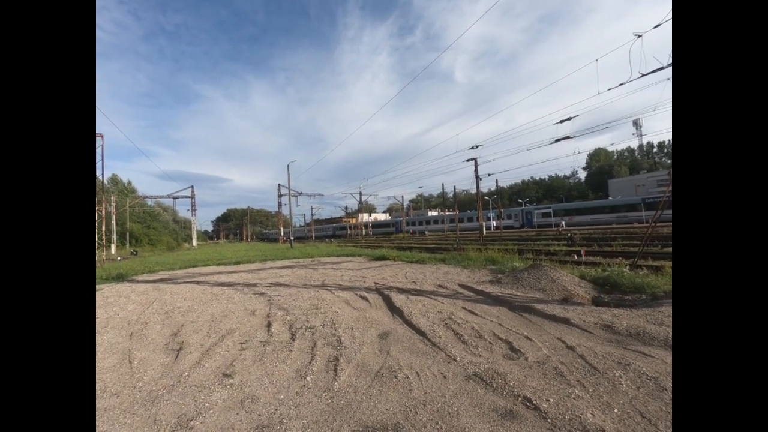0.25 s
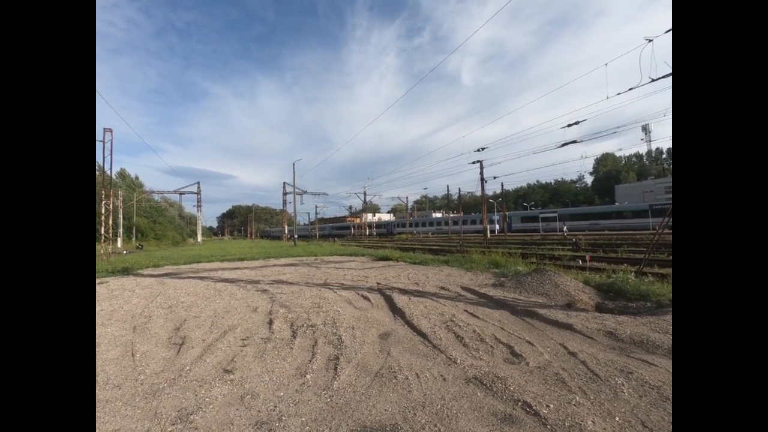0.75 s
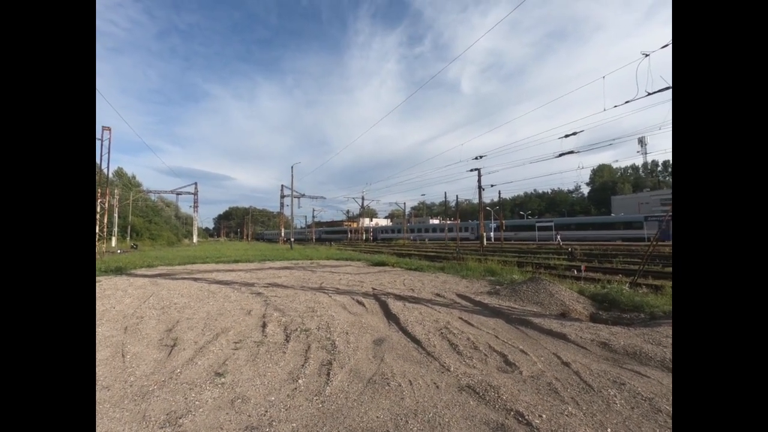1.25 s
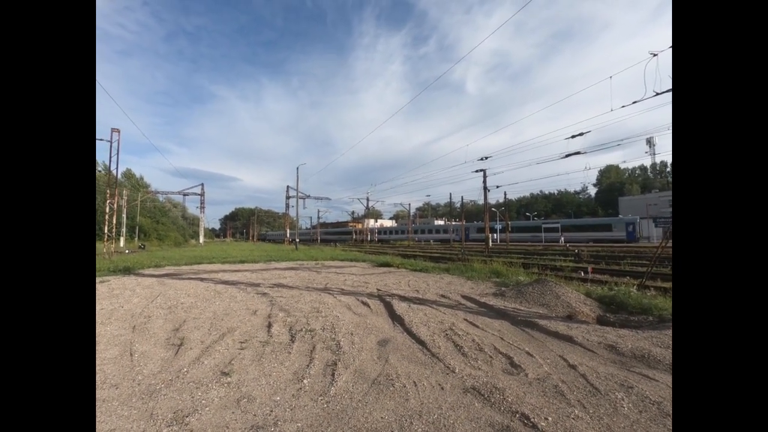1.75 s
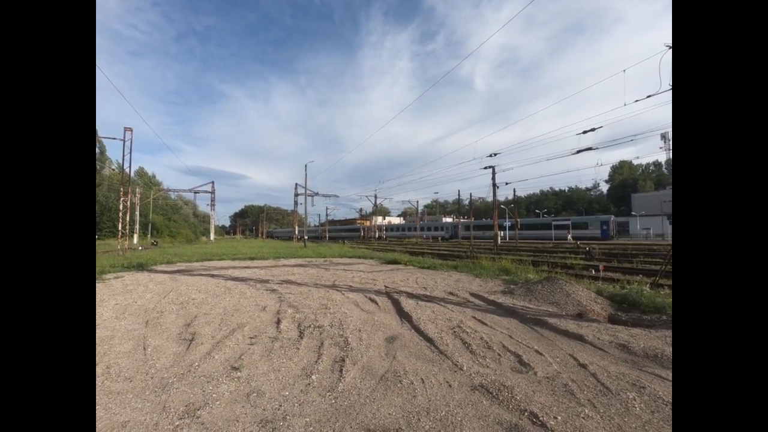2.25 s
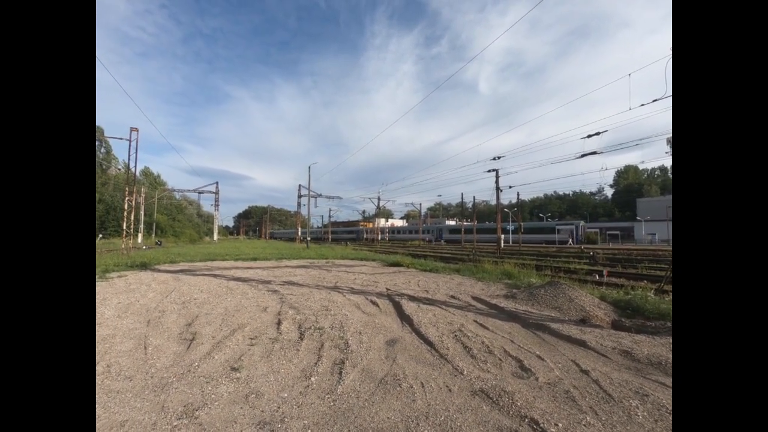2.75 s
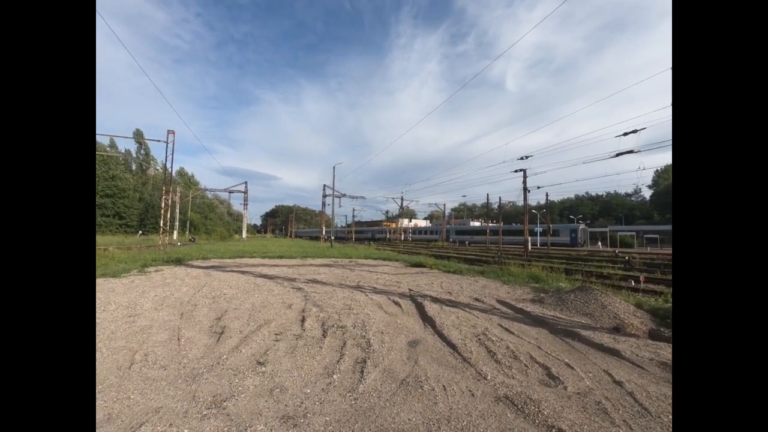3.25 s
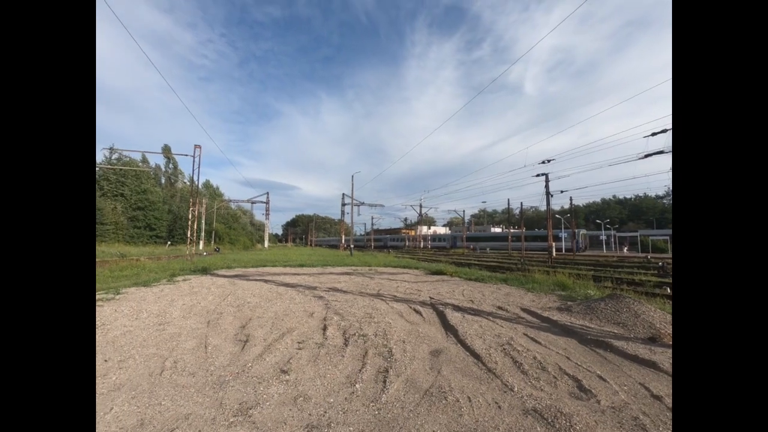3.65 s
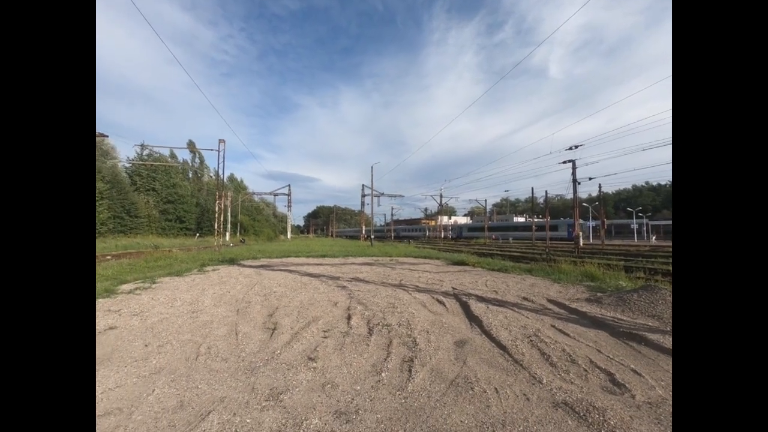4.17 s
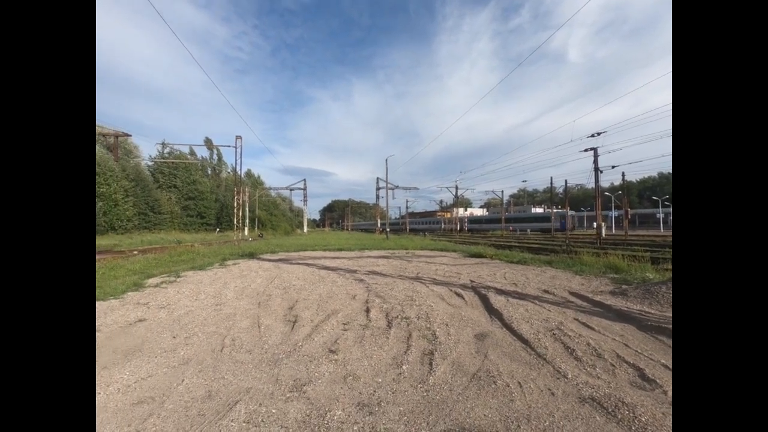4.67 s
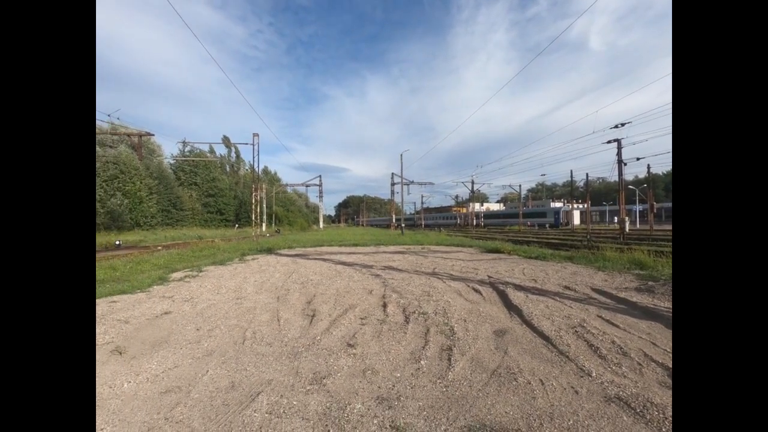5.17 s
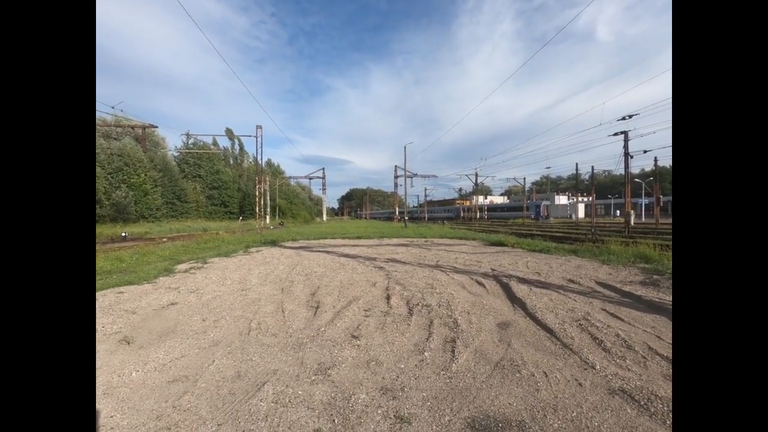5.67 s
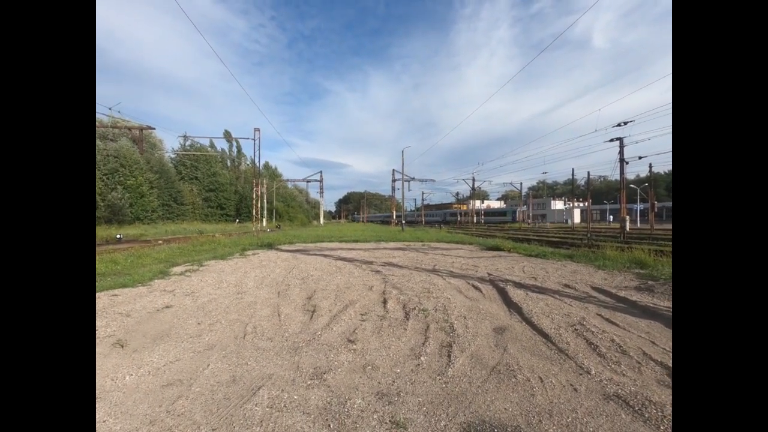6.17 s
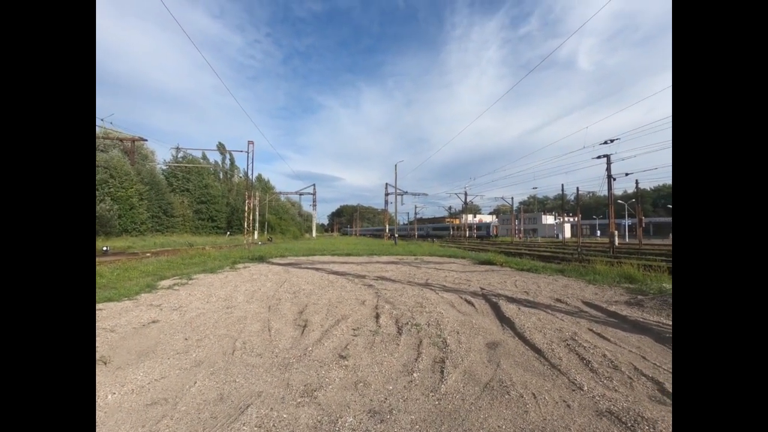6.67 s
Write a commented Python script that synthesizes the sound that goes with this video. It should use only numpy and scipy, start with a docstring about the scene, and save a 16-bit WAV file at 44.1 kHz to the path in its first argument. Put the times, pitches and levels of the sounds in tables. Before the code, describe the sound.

An open station yard, heard through a wind-exposed camera microphone. A passenger train rolls steadily some distance to the right: low rumble, mid-range wheel roar, gradually weakening. Low gusts buffet throughout, uneven between the sides and mostly stronger left. A clank opens at 0.1 s; a thin, grainy squeal near 3.7 kHz fades out by 2 s. A motor hum creeps up from about 145 to 160 Hz, swelling near 3 s and gone by 3.7, with faint gear whine. Couplings clank and ring from 2.0 to 2.4 s, with duller knocks at 2.7-3.1. Flange scrapes hiss and squeak at 2.8, strongly at 3.8 and 4.65, softer at 5.7, bright again at 6.75. Gusts churn and pop at 5.1-5.5 s; one close snap and thump hits the housing at 5.6. Wind flutters hard at 6.5 and 6.9, this time on the right.

```python
"""Station yard: a passenger train rolls through, some way off to the right.
Shaped noise makes rumble and wheel roar; wavering sines make motor and gear hum and one thin, fading squeal.
Couplings clank as decaying noise and rough rings; curve-bound flanges hiss, ring and squeak every second or so.
Gusts of low noise buffet the microphone ports, churning and popping at their strongest.
Something knocks once on the camera: a snap and a low thump through its housing."""
import sys
import numpy as np
from scipy import signal
from scipy.fft import rfft, irfft, next_fast_len
from scipy.io import wavfile
from scipy.ndimage import map_coordinates

SR = 44100
rng = np.random.default_rng(int(sys.argv[2]) if len(sys.argv) > 2 else 0)


def output_pcm(signal):
    """Save a mono or channel-first signal as 16-bit PCM at the path in sys.argv[1].

    Samples are clipped to [-1, 1] before scaling.
    """
    pcm = np.clip(np.atleast_2d(signal).T, -1, 1) * 32767
    wavfile.write(sys.argv[1], SR, np.round(pcm).astype(np.int16))


N = 305172


def amp(db):
    """Decibels to gain."""
    return 10 ** (np.asarray(db) / 20)


def unit(x):
    """Scale to rms 1."""
    return x / np.sqrt(np.mean(x ** 2) + 1e-20)


def clock():
    """Time of every sample in s."""
    return np.arange(N) / SR


def along(points, hz):
    """Interpolate (f/Hz, value) points on a log frequency axis."""
    f, v = np.transpose(points)
    return np.interp(np.log(hz + 1), np.log(f + 1), v)


def curves(rows):
    """One value per sample for each column after the time."""
    s, *cols = np.transpose(rows)
    return [np.interp(clock(), s, c) for c in cols]


def during(start_s, end_s, fade_s=0.23):
    """1 from start to end, linear fades to 0 outside."""
    t = clock()
    return np.clip(1 + np.minimum(t - start_s, end_s - t) / fade_s, 0, 1)


def wobble(knots_per_s):
    """Smooth random curve through normal random knots."""
    knots = rng.standard_normal(int(N * knots_per_s / SR) + 4)
    return map_coordinates(knots, [np.arange(N) * knots_per_s / SR])


def filtered(x, response):
    """Apply a complex response of frequency."""
    size = next_fast_len(N + SR // 2)
    spectrum = rfft(x, size) * response(np.fft.rfftfreq(size, 1 / SR))
    return irfft(spectrum, size)[..., :N]


def noise(gain):
    """Two independent noises, jointly of rms 1, coloured by a gain of frequency."""
    return unit(filtered(rng.standard_normal((2, N)), gain))


def bell(hz, centre_hz, width_hz):
    """Resonance curve, peak 1, half height at centre +/- width/2."""
    return 1 / (1 + (2 * (hz - centre_hz) / width_hz) ** 2)


def panned(db):
    """Left and right gains, averaging 1, for a left-minus-right level difference."""
    ratio = amp(np.atleast_1d(db))
    return 2 * np.array([ratio, np.ones_like(ratio)]) / (1 + ratio)


def add(track, s, sound):
    """Mix a sound into a track at time s, cut at the track's end."""
    part = track[..., round(s * SR):][..., :sound.shape[-1]]
    part += sound[..., :part.shape[-1]]


def tone(hz, drift, flutter_db, flutter_knots_per_s=22):
    """Sine of about rms 1; pitch (drift as a share) and level waver."""
    phase = 2 * np.pi * np.cumsum(hz * (1 + drift * wobble(35))) / SR
    return np.sqrt(2) * amp(flutter_db * wobble(flutter_knots_per_s)) * np.sin(phase)


# rolling noise spectrum: f/Hz, relative density/dB
ROLLING_SPECTRUM = [(300, -15), (600, -0.5), (830, 6.5), (1150, 0), (1900, -4), (3400, -3), (4000, -7),
                    (4900, -13), (5900, -11), (7700, -10), (8100, -19.5), (10000, -29), (11500, -47),
                    (15000, -79)]
# broad wheel and rail resonances: f/Hz, width/Hz, lift/dB
TRACK_RESONANCES = [(1594, 227, 8), (2274, 215, 9), (2753, 54, 9), (3246, 270, 4)]


def track_colour(hz):
    """Rolling spectrum, lifted where wheel and rail resonate."""
    lift = sum(amp(db) ** 2 * bell(hz, f, width) for f, width, db in TRACK_RESONANCES)
    return amp(along(ROLLING_SPECTRUM, hz)) * np.sqrt(1 + lift)


# levels as heard at the camera, dropping after the hard gust, before the layer gains:
# t/s, rumble level/dB, rolling level/dB
HEARD_LEVELS = [(0.0, -49.5, -51.5), (1.29, -51.5, -55.5), (2.79, -48, -54.5), (3.43, -53.5, -55.5),
                (4.26, -55, -55.5), (4.53, -54, -56.5), (5.05, -53, -54), (5.36, -52, -60.5),
                (5.59, -58, -60.5), (6.09, -58.5, -59), (6.69, -59.5, -59), (6.92, -54.5, -55)]
# rumble spectrum: f/Hz, relative density/dB
RUMBLE_SPECTRUM = [(30, -18), (90, 0), (160, 0.5), (200, -2.5), (245, -1), (330, -12.5), (430, -13.5),
                   (530, -23.5), (650, -26.5), (820, -26), (1500, -63)]
RUMBLE_GAIN_DB, ROLLING_GAIN_DB = 11, 5.5


def rolling(surge_db=2.6, surge_knots_per_s=13):
    """Rough treads shake the car bodies in surges low down, and wheels and rails higher up."""
    rumble_db, roll_db = curves(HEARD_LEVELS)
    rumble_db = rumble_db + RUMBLE_GAIN_DB + surge_db * wobble(surge_knots_per_s)
    roll_db = roll_db + ROLLING_GAIN_DB + 0.5 * wobble(14)
    rumble = amp(rumble_db) * noise(lambda hz: amp(along(RUMBLE_SPECTRUM, hz)))
    return rumble + amp(roll_db) * noise(track_colour)


# traction motor: t/s, f/Hz, level/dB, octave level/dB
MOTOR_TRACK = [(0, 145, -38, -62), (.45, 146, -38, -51), (.8, 147.5, -47.5, -57),
               (1.3, 149.5, -48.5, -57.5), (1.7, 152.4, -40.5, -54), (2.15, 154, -42.5, -56),
               (2.35, 155, -36.5, -62), (2.7, 156, -35.5, -65), (3.0, 159, -31.5, -60),
               (3.25, 160, -44, -60), (3.7, 160.6, -43.5, -67.5)]
# gear whine: t/s, lower tone level/dB, upper tone level/dB
GEAR_LEVELS = [(0, -57.5, -62), (1.0, -60, -68), (1.8, -58.5, -71.5), (2.4, -62.5, -59.5), (3.1, -62, -56)]
GEAR_LOW_HZ, GEAR_HIGH_HZ = 413.2, 433
HUM_FLUTTER_DB, HUM_FLUTTER_KNOTS_PER_S = 2.2, 16
MOTOR_DRIFT, GEAR_DRIFT = 0.009, 0.007  # shares of the pitch


def hum(hz, db, drift):
    """Sine hum, wavering on its way through the air."""
    return amp(db) * tone(hz, drift, HUM_FLUTTER_DB, HUM_FLUTTER_KNOTS_PER_S)


def drive():
    """Motor pitch with its octave, and two steady-pitched gear tones."""
    motor_hz, motor_db, octave_db = curves(MOTOR_TRACK)
    low_db, high_db = curves(GEAR_LEVELS)
    motor = hum(motor_hz, motor_db, MOTOR_DRIFT) + hum(2 * motor_hz, octave_db, MOTOR_DRIFT)
    gears = hum(GEAR_LOW_HZ, low_db, GEAR_DRIFT) + hum(GEAR_HIGH_HZ, high_db, GEAR_DRIFT)
    return during(0, MOTOR_TRACK[-1][0]) * motor + during(0, GEAR_LEVELS[-1][0]) * gears


SQUEAL_HZ, SQUEAL_START_DB, SQUEAL_FADE_DB_PER_S, SQUEAL_END_S = 3670, -59.5, 3.5, 2.0
OCTAVE_START_S, OCTAVE_END_S = 0.36, 0.68


def squeal(octave_db=-3.5):
    """One wheel mode locks into stick-slip: a thin, grainy, fading tone with a brief octave."""
    octave = tone(2 * SQUEAL_HZ, drift=0.0013, flutter_db=2.5)
    octave *= amp(octave_db) * during(OCTAVE_START_S, OCTAVE_END_S, fade_s=0.4)
    fundamental = tone(SQUEAL_HZ, drift=0.0022, flutter_db=2.5, flutter_knots_per_s=44)
    level = amp(SQUEAL_START_DB - SQUEAL_FADE_DB_PER_S * clock())
    return during(0, SQUEAL_END_S, fade_s=0.5) * level * (fundamental + octave)


# gusts: peak t/s, time from peak to -17 dB/s, level/dB, left minus right/dB
GUST_EVENTS = [(.12, .08, -24, -12), (.24, .12, -22.5, -12), (.39, .08, -25, -12), (.78, .13, -26, -13),
               (.89, .08, -29, -10), (1.13, .1, -30, -10), (1.52, .1, -29, -11), (1.85, .07, -27.5, -6),
               (2.14, .12, -28.5, -5), (2.42, .12, -26, -6), (2.76, .12, -29, -7), (2.98, .2, -29, -8),
               (3.34, .15, -26, -10), (3.65, .06, -27, -9), (3.75, .06, -27, -7), (3.96, .11, -25.5, -7),
               (4.25, .13, -23, -6), (4.6, .08, -28, -6), (4.76, .1, -26.5, -7), (4.9, .13, -24.5, -11),
               (5.08, .2, -23, -10), (5.36, .2, -25, -15), (5.52, .13, -26, -13), (5.75, .15, -29, -9),
               (6.33, .14, -27.5, -11), (6.54, .1, -28, -3), (6.74, .14, -22.5, -7), (6.88, .1, -22, -3)]
# buffeting spectrum: f/Hz, relative density/dB
BUFFET_SPECTRUM = [(10, -10), (24, 0), (45, 2.5), (75, -1.5), (115, -4), (170, -17), (260, -30.5),
                   (450, -42), (1000, -96)]
BREEZE_DB, BREEZE_PAN_DB = -32, -6  # pan: left minus right


def wind(spread_db=2.6, shared=0.51, heave_db=-3.0):
    """Gusts over a breeze: turbulence rumbles in separate lumps per port; hard gusts heave deeper."""
    t = clock()
    gusts = np.zeros((2, N))
    for s, length_s, db, pan_db in GUST_EVENTS:
        gusts += amp(db) * panned(pan_db) * np.exp(-2 * ((t - s) / length_s) ** 2)
    strength = np.hypot(amp(BREEZE_DB) * panned(BREEZE_PAN_DB), gusts)
    a, b = noise(lambda hz: amp(along(BUFFET_SPECTRUM, hz)))
    ports = np.array([shared * a + np.sqrt(1 - shared ** 2) * b, a])  # correlation = shared
    lumps = amp(spread_db * np.array([wobble(16), wobble(18)]))
    deep = noise(lambda hz: bell(hz, 24, 36) ** 1.5)
    heave = amp(heave_db) * strength / strength.max() * deep
    return strength * (unit(lumps * ports) + heave)


SAG_DB_PER_S, RELEASE_DB_PER_S = 6, 41  # release adds to sag


def bite(s, attack_s, hold_s):
    """Flange pressure: linear rise, sag while held, then a faster release as it slides off."""
    t = np.maximum(clock() - s, 0)
    held = np.maximum(t - attack_s, 0)
    released = np.maximum(held - hold_s, 0)
    return np.minimum(t / attack_s, 1) * amp(-SAG_DB_PER_S * held - RELEASE_DB_PER_S * released)


PATCH_HZ, PATCH_S, RESTLESS_DB = 169.2, 0.09, 2.2  # knot spacings and depth of the random field


def restless(pair):
    """The contact point wanders over the wheel, favouring now some modes, now others."""
    z = signal.stft(pair, nperseg=1024)[2]
    bins, frames = z.shape[1:]
    across_f = np.linspace(0, SR / 2 / PATCH_HZ, bins)
    across_t = np.linspace(0, N / SR / PATCH_S, frames)
    where = np.meshgrid(across_f, across_t, indexing="ij")
    field = map_coordinates(rng.standard_normal((bins, frames)), where, mode="mirror")
    return signal.istft(z * unit(amp(RESTLESS_DB * field)), nperseg=1024)[1][:, :N]


# flange bites: t/s, attack/s, hold/s, relative level/dB, lift of the top hiss/dB
FLANGE_BITES = [(0.037, 0.086, 0.037, -65.5, 4), (2.805, 0.085, 0.13, -54.7, 1.8),
                (3.15, 0.036, 0.036, -68, -1), (3.658, 0.028, .02, -68, 6),
                (3.817, 0.036, 0.37, -51.5, 5.3), (4.65, 0.086, 0.43, -53, 3.5), (4.86, .08, 0.089, -61, 1),
                (5.73, 0.06, 0.26, -61.5, 2), (6.15, .1, .2, -73, -10), (6.736, 0.094, 0.059, -51, -0.5)]
# scrape hiss spectrum: f/Hz, relative density/dB
SCRAPE_SPECTRUM = [(700, -26), (1600, -8.5), (3300, 5.5), (4700, 0), (6000, 2.5), (7800, 2), (8400, -0.5),
                   (10700, -9), (11400, -21), (13600, -20), (15000, -44.5)]
# families of close wheel modes: f/Hz, width/Hz, relative level/dB
WHEEL_MODES = [(1636, 70, -5), (2450, 190, 0.5), (3305, 110, 2.5), (4170, 98, 1.5), (5070, 120, -3.5),
               (5650, 80, -9.5), (6000, 180, 1), (6910, 260, -1.5), (7540, 120, -3), (7745, 220, 2),
               (8700, 130, -10.5), (9600, 160, -16), (10500, 300, -21)]
JUDDER_DB, JUDDER_KNOTS_PER_S = 1.2, 45


def flanges(ring_t60_s=0.9, hiss_db=2.0, ring_db=1.2, spacing_hz=14):
    """Each scrape judders, hisses and feeds the wheel's modes, which shift and ring on after it."""
    keep = np.exp(-2 * np.log(1000) / (ring_t60_s * SR))  # energy kept per sample
    grid_hz = np.arange(0, SR / 2, spacing_hz)
    power = sum(amp(db) ** 2 * bell(grid_hz, f, width) ** 2 for f, width, db in WHEEL_MODES)
    families = np.sqrt(power)
    force, sharp, ring = np.zeros(N), np.zeros(N), np.zeros((2, N))
    for s, attack_s, hold_s, db, edge_db in FLANGE_BITES:
        push = amp(db) * bite(s, attack_s, hold_s)
        stored = np.sqrt(signal.lfilter([1 - keep], [1, -keep], push ** 2 + 1e-20))
        # own strong and weak modes per scrape
        modes = families * amp(3.5 * rng.standard_normal(len(grid_hz)))
        ring += stored * noise(lambda hz: np.interp(hz, grid_hz, modes))
        force += push
        sharp += amp(edge_db) * push
    # hiss radiates from the same steel, so the families colour it too
    steel = (1 + 1.2 * families / families.max()) * amp(2.5 * rng.standard_normal(len(grid_hz)))
    hiss = noise(lambda hz: amp(along(SCRAPE_SPECTRUM, hz)) * np.interp(hz, grid_hz, steel))
    edge = filtered(hiss, lambda hz: 1 / (1 + (8200 / (hz + 1)) ** 24))  # above 8200 Hz
    # harder contact: more hiss against ring, and brighter
    pressure = (force / force.max()) ** 0.11
    rasp = force * (hiss - edge) + sharp * pressure ** 2 * edge
    judder = amp(hiss_db + JUDDER_DB * wobble(JUDDER_KNOTS_PER_S))
    return restless(judder * pressure * rasp + amp(ring_db) * ring)


# couplings and bogies: t/s, clash level/dB, hollow body level/dB, ring level/dB, ring f/Hz,
# t60/s, ring phase scatter/rad
CLANK_EVENTS = [(.088, -38, -48, -41, 3240, 0.19, 1), (1.962, -44.5, -52, -45.5, 3520, 0.16, 1.2),
                (2.102, -41.5, -38, -44, 2356, 0.13, 1.5), (2.124, -47, -52, -44.5, 2850, 0.16, 1.4),
                (2.156, -48, -51, -48, 2300, .14, 1.3), (2.251, -47, -51.5, -50, 3300, .2, 1),
                (2.262, -52, -52, -40, 3220, .14, .8), (2.282, -52, -55, -41, 3270, .1, .8),
                (2.395, -38.5, -51, -32.5, 2790, 0.13, .2), (2.424, -45, -55, -43, 2780, 0.16, .3),
                (2.705, -56, -46, -58, 2300, .2, 1), (2.763, -55, -44, -58, 2300, .14, 1),
                (2.822, -52, -43.5, -56, 2300, .18, 1), (3.129, -44, -43.5, -52, 2780, .12, 1)]


def clanks(attack_s=0.0032, thud_db=6, upper_db=5, second_db=-5, rough_db=3.0):
    """Distant steel blows smeared by the yard: bright clash, hollow body with low thud, rough ring."""
    t = np.arange(SR // 2) / SR
    clash, body, ring = np.zeros((3, N))
    for s, clash_db, body_db, ring_db, ring_hz, t60_s, scatter in CLANK_EVENTS:
        shape = (1 - np.exp(-t / attack_s)) * amp(-60 * t / t60_s)
        phase = 2 * np.pi * ring_hz * t + scatter * wobble(300)[:len(t)]
        add(clash, s, amp(clash_db) * shape)
        add(body, s, amp(body_db) * shape)
        add(ring, s, amp(ring_db) * shape * np.sin(phase))

    def clash_colour(hz):
        band = hz / np.hypot(hz, 1200) / np.hypot(1, hz / 7000)
        return track_colour(hz) * band * (1 + amp(upper_db) * bell(hz, 5930, 400))

    bright = noise(clash_colour)
    hollow = noise(lambda hz: bell(hz, 760, 260) + amp(second_db) * bell(hz, 1560, 370))
    thud = noise(lambda hz: bell(hz, 170, 130) ** 1.5)
    rough = unit(amp(rough_db * wobble(160)))
    return clash * bright + body * (hollow + amp(thud_db) * thud) + ring * rough


# gusts breaking up: peak t/s, decay time constant/s, level/dB, left minus right/dB, f/Hz
CHURN_EVENTS = [(.11, 0.026, -37, -14, 145), (5.16, 0.08, -31, -19, 185), (5.33, .1, -38.5, -17, 200),
                (5.41, 0.06, -33.5, -19, 200), (5.55, 0.021, -32, -19, 160), (6.5, 0.054, -28.5, 12, 145),
                (6.58, 0.086, -35, 3, 160), (6.861, 0.18, -25.5, 23, 155)]
CHURN_RISE_S = 0.015


def churn(width_share=1.25, flutter_db=2.9):
    """Stronger gusts break suddenly into smaller eddies that flutter higher up and die away."""
    out, t = np.zeros((2, N)), clock()
    for s, fade_s, db, pan_db, centre_hz in CHURN_EVENTS:
        envelope = np.exp(-np.maximum((s - t) / CHURN_RISE_S, (t - s) / fade_s))
        eddies = noise(lambda hz: bell(hz, centre_hz, width_share * centre_hz) ** 1.42)
        out += amp(db) * panned(pan_db) * envelope * eddies
    return out * amp(flutter_db * wobble(30))


# stick-slip squeaks: t/s, length/s, f/Hz, level/dB, glide/(Hz/s), pitch waver/share
SQUEAK_EVENTS = [(2.87, 0.22, 5905, -55, 0, .005), (2.86, .24, 7680, -57.5, 0, .011),
                 (3.02, .42, 6030, -63, 0, .004), (3.08, .22, 6850, -62, 0, .007),
                 (2.9, .45, 4180, -62.5, 0, .006), (3.83, 0.15, 6005, -48, 0, .002),
                 (3.82, 0.28, 7855, -51.5, 0, .002), (3.8, 0.22, 4140, -53.5, 0, 0.0028),
                 (3.83, .56, 3290, -63, 0, .009), (3.958, .26, 10718, -60, 0, .0012),
                 (4.115, 0.14, 7792, -54, 0, .002), (4.256, 0.16, 4200, -53.5, 0, .003),
                 (4.33, 0.15, 2175, -51, -200, .004), (4.824, 0.31, 7780, -53, -2, 0.0035),
                 (4.954, 0.36, 5740, -59, 0, .004), (4.919, .6, 6030, -68, 0, .005),
                 (5.08, 0.75, 4200, -66, 0, .005), (5.5, .25, 6990, -65, 0, .003),
                 (5.4, 0.16, 6000, -65, 0, .003), (5.748, 0.77, 7790, -61.5, 0, 0.0071),
                 (5.92, .6, 7540, -66, 0, .007), (5.879, 0.74, 3285, -59, 0, .005),
                 (5.99, 0.39, 6100, -60.5, 0, .006), (6.28, 0.3, 6045, -62, 0, .003),
                 (6.06, .3, 5706, -63, 0, .004), (6.0, 0.7, 6860, -67, -1, 0.0078),
                 (6.76, 0.3, 4138, -50, 0, 0.0025), (6.77, 0.26, 5040, -57.5, 0, .003),
                 (6.78, .26, 3290, -54, 0, .007), (6.79, .24, 6020, -58, 0, 0.0042)]
SQUEAK_RASP_RAD, RASP_KNOTS_PER_S = 0.25, 520


def squeaks(flutter_db=3.0):
    """During a scrape single modes lock on for a moment, waver or slide, and let go."""
    out = np.zeros(N)
    bend, flutter = wobble(160), amp(flutter_db * wobble(75))
    slip = SQUEAK_RASP_RAD * wobble(RASP_KNOTS_PER_S)  # uneven slips fray each tone into the hiss
    for s, length_s, hz, db, glide, waver in SQUEAK_EVENTS:
        size = max(round(length_s * SR), 2)
        start = rng.integers(N // 2)
        part = slice(start, start + size)
        slide_hz = glide * (np.arange(size) / SR - length_s / 2)
        pitch_hz = hz * (1 + waver * bend[part]) + slide_hz
        phase = 2 * np.pi * np.cumsum(pitch_hz) / SR + slip[part]
        envelope = signal.windows.tukey(size, 0.85) * flutter[part]
        add(out, s, amp(db) * envelope * np.sin(phase))
    return out


# single eddies bursting on the ports: t/s, strength/dB, left minus right/dB, sharpness f/Hz
POP_EVENTS = [(5.133, -13, -10, 520), (5.159, -9.5, -6, 780), (5.164, -3, -20, 320), (5.178, -3, -10, 460),
              (5.188, -7.5, -11, 480), (5.21, -5.5, -10, 340), (5.261, -7, -10, 460),
              (5.335, -11, -15, 370), (5.381, -10, -13, 450), (5.411, -1.5, -11, 420),
              (5.459, -13, -10, 340), (6.567, -16, -18, 1000)]


def pops(life_cycles=0.44):
    """In hard gusts single eddies hit a port: push then suck, sharper for smaller eddies."""
    out, t = np.zeros((2, N)), np.arange(SR // 20) / SR
    for s, db, pan_db, sharp_hz in POP_EVENTS:
        u = t * sharp_hz / life_cycles
        pulse = u * (1 - u / 2) * np.exp(-u)
        soften = signal.butter(4, sharp_hz, fs=SR, output="sos")
        add(out, s, amp(db) * panned(pan_db) * signal.sosfilt(soften, pulse))
    return out


# camera housing's response to a tap: f/Hz, gain/dB
HOUSING_RESPONSE = [(300, 2), (850, 3.5), (1800, -5.5), (2800, 8), (3300, 1.5), (4000, -16), (5500, -7.5),
                    (8000, -7), (10000, -11), (12000, -22), (15000, -26.5)]
KNOCK_S = 5.578
KNOCK_TURN_HZ = 1200  # left port phase is turned 1 rad here


def housing(hz):
    """Housing gain, with a left-port phase lead growing to 1.3 rad."""
    lead_rad = np.array([[1], [0]]) * np.minimum(hz / KNOCK_TURN_HZ, 1.3)
    return amp(along(HOUSING_RESPONSE, hz)) * np.exp(1j * lead_rad)


def knock(thump_s=0.0108, build_s=0.0004, release_s=0.0005, crack_db=-5.0, thump_db=-9.5,
          thump_pan_db=-11.0):
    """A tap on the camera: pressure builds and snaps through the housing, then one low thump."""
    out, t = np.zeros((2, N)), np.arange(-SR // 200, SR // 40) / SR
    snap = np.where(t < 0, np.exp(-abs(t) / build_s), -0.5 * np.exp(-abs(t) / release_s))
    # short push, then a longer, fading suck
    u = np.clip((t - 0.0009) / thump_s, 0, 1)
    thump = np.sin(2 * np.pi * 2 * u / (1 + u)) * (1 - u ** 2)
    crack = amp(crack_db) * np.array([[-0.6], [1]]) * snap  # opposite signs at the ports
    add(out, KNOCK_S + t[0], crack + amp(thump_db) * panned(thump_pan_db) * thump)
    return filtered(out, housing)


# likeness of the distant sound at the two ports: f/Hz, correlation/1
PORT_LIKENESS = [(60, 1), (250, 0.92), (550, 1), (1100, 0.92), (2400, 0.7), (5000, 0.48), (10000, 0.61)]
# level difference of the ports: f/Hz, left minus right/dB
PORT_BALANCE = [(150, -3.5), (500, -9), (1050, -2), (3200, -2), (5800, -8), (10000, -2)]
# phase difference of the ports: f/Hz, left lead/rad
PORT_LEAD = [(350, -0.13), (550, 1.72), (780, 1.91), (1200, 1.79), (2700, 1.33), (4900, -0.36),
             (6200, -1.13), (7400, -1.9), (8500, -0.94), (10000, -0.22)]


def from_the_right(pair):
    """Direct and scattered sound reach the two ports at different levels and phases."""
    def mix(hz):
        turn = np.arccos(np.clip(along(PORT_LIKENESS, hz), -1, 1)) / 2
        return np.array([np.cos(turn), np.sin(turn)])

    def offset(hz):
        lead = np.exp(0.5j * np.array([[1], [-1]]) * along(PORT_LEAD, hz))
        return panned(along(PORT_BALANCE, hz)) * lead

    direct, scattered = filtered(pair, mix)
    return filtered(np.array([direct + scattered, direct - scattered]), offset)


def scene():
    """The distant train behind the wind and the knock on the camera."""
    train = rolling() + flanges() + clanks()
    train[0] += drive() + squeal() + squeaks()  # tones arrive on the direct path
    return from_the_right(train) + wind() + churn() + pops() + knock()


TOP_HZ = 15000


def record(dry):
    """Camera band limit: steep zero-phase low-pass."""
    return signal.sosfiltfilt(signal.butter(14, TOP_HZ, fs=SR, output="sos"), dry)


dry = scene()
out = record(dry)
output_pcm(out)
```